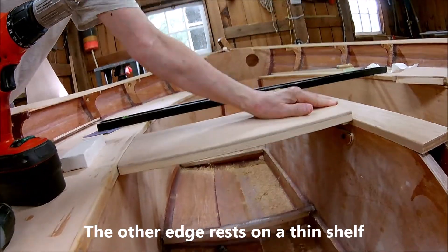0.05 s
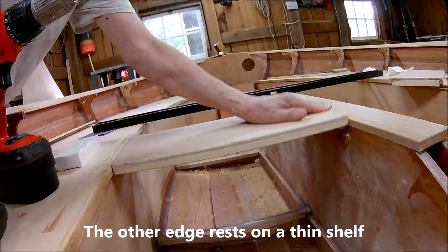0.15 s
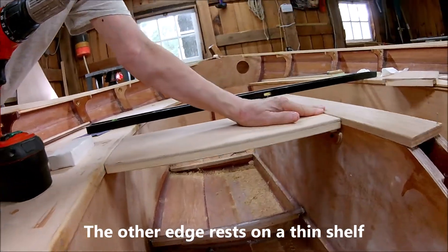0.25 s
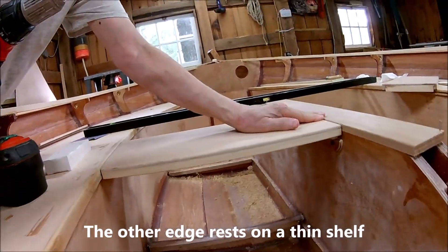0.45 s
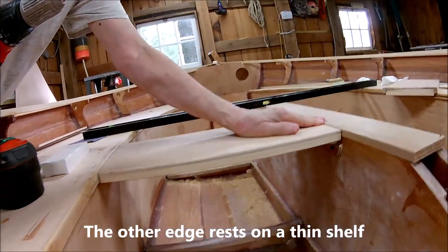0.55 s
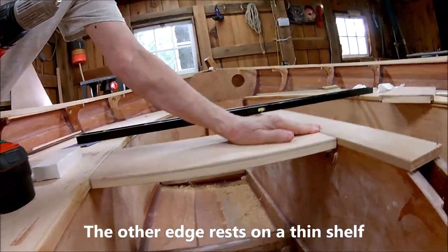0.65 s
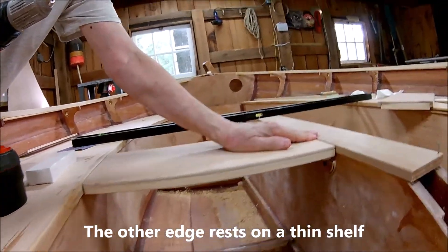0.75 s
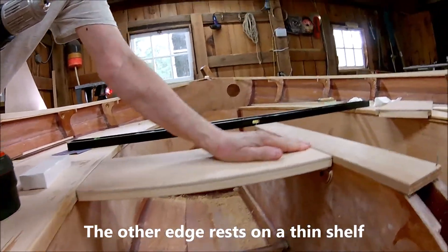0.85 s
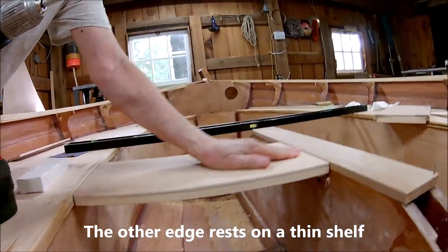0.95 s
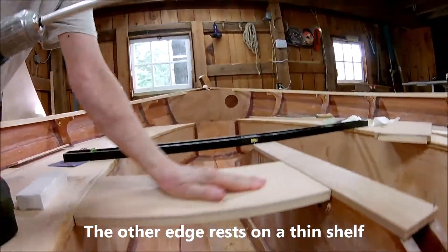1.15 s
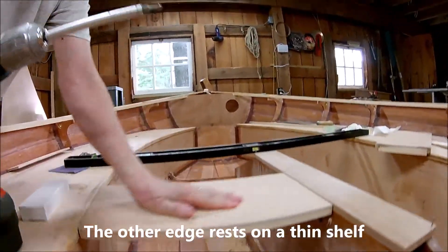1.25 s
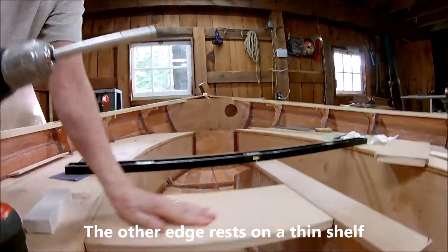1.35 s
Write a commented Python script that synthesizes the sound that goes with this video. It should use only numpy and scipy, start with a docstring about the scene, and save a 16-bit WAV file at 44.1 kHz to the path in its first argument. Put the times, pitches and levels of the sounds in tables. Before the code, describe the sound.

Loud board knock on a hollow boat hull after a brief scrape, followed by a soft dry rub

```python
"""Inside a workshop, one channel, over low rumble and faint hiss: a plywood board slides along a wooden boat's
framing (noise and tiny slips), touches down and chatters (soft ringing contacts over a dull grind).
It lands with one hard knock that overloads the recorder: board modes ring, hull and workshop answer in a
dense tail, and the hull booms on as a slow wandering low tone. After a pause a hand pushes the board on
with a dry rub, made like the first slide."""
import sys
import numpy as np
from scipy import signal
from scipy.fft import rfft, irfft, next_fast_len
from scipy.io import wavfile
from scipy.ndimage import map_coordinates

SR = 44100
rng = np.random.default_rng(int(sys.argv[2]) if len(sys.argv) > 2 else 0)


def put_to_file(sound):
    """Save the sound as 16-bit audio at rate SR, in the file named by the first command-line argument."""
    columns = np.atleast_2d(sound).T  # one column per channel
    safe = np.clip(columns, -1, 1)
    whole_steps = np.round(safe * 32767)
    wavfile.write(sys.argv[1], SR, whole_steps.astype(np.int16))


N = 61739

# Room tone, rumble spectrum: f/Hz, density/dB per Hz (relative)
RUMBLE_SPECTRUM = [(12, -38), (20, -8.5), (43, -13.5), (90, -8.5), (141, -13.5), (179, -29.5), (321, -24),
                   (354, -31.5), (600, -42.5), (780, -73), (1320, -120)]
# Faint hiss spectrum: f/Hz, density/dB per Hz (relative)
HISS_SPECTRUM = [(290, -29.5), (500, 4.5), (2130, -12), (2330, -11.5), (2850, -13), (3490, -15.5),
                 (4660, -18), (16000, -21.5)]
RUMBLE_DB, HISS_DB = -59, -71  # rms levels; the rumble wavers about its own

# Hull boom: t/s, level/dB before its waver
BOOM_LEVEL = [(.18, -62), (.21, -48), (.29, -48), (.37, -43), (.45, -48), (.55, -58), (.7, -63), (1.1, -64),
              (1.3, -75)]
BOOM_HZ, BOOM_WANDER_HZ = 37, 4  # centre; size of the random pitch wander

# Decay of the early answer of hull and workshop: f/Hz, t60/s
SHOP_DECAY = [(100, .3), (400, 0.17), (1000, 0.19), (2500, .15), (4500, .12), (7000, 0.095), (12000, .06)]
# Colour of that dense answer: f/Hz, density/dB per Hz (relative)
SHOP_COLOUR = [(35, -30.5), (60, -4.5), (173, -8.5), (253, -3.5), (371, -14), (544, -7.5), (934, -5.5),
               (1020, -7), (1470, -8), (2200, -18), (2690, -21.5), (3150, -31), (4030, -28), (13000, -75.5)]
SHOP_DB, SHOP_RISE_S = 13.5, .006  # level relative to the contact; time constant of the swell
LATE_DB, LATE_LONGER = -11.5, 2.763  # a weaker tail under it; its t60 as a multiple of the early one

# Board sliding on frame, one table a slide: t/s, body level/dB, treble level/dB, before their wavers
SLIDE_LEVELS = [
    [(0, -60.5, -73), (.1, -60, -73.5), (.14, -56, -70), (.17, -42.5, -68), (.19, -38.5, -54),
     (.212, -45, -62), (.26, -110, -115)],
    [(.74, -90, -93), (.77, -80, -105), (.8, -64.5, -79), (.84, -59, -75), (.88, -51.5, -64.5),
     (1.05, -49.5, -61.5), (1.18, -48.5, -60), (1.26, -50, -58), (1.4, -53, -64.5)],
]
# Broad resonances of the rubbed board: f/Hz, density/dB per Hz (relative)
RUB_BODY = [(120, -40), (200, -7.5), (233, -22), (311, -22.5), (424, -13.5), (728, -10.5), (888, -5.5),
            (1530, -4.5), (1820, -2.5), (2800, -32.5), (3640, -45.5), (6160, -120)]
# Treble of the rub: f/Hz, density/dB per Hz (relative)
RUB_TREBLE = [(1470, -32), (2500, 0.5), (2830, -14), (3460, -4.5), (3720, -3.5), (4050, 0), (4480, -6),
              (5370, -10.5), (7060, -9.5), (7980, -28.5), (8950, -21.5), (10400, -22), (11500, -27),
              (14000, -39)]
SLIPS_PER_S, SLIP_SPREAD_DB = 2000, 2.5  # mean rate; mean random boost of a slip
SLIP_SHARE = .3  # rms of the slips against noise of rms 1

# The edge grinds before it lands: t/s, level/dB before its waver
JUDDER_LEVEL = [(.1455, -60), (.147, -35), (.165, -36), (.18, -30), (.19, -25), (.203, -25), (.211, -29),
                (.225, -50), (.25, -120)]
# Colour of the grind: f/Hz, density/dB per Hz (relative)
JUDDER_BODY = [(53, -37), (90, -12.5), (172, 4.5), (363, -13), (459, 7.5), (723, -11), (789, 1.5),
               (849, -17.5), (1070, 0), (1170, -10.5), (1600, -8), (3000, -38.5), (3900, -73.5),
               (6600, -120)]

# Contacts of board on frame: t/s, strength/dB, contact sharpness f/Hz
CONTACTS = [(.1462, -27, 500), (.1835, -27, 900), (.1895, -26, 600), (.198, -27, 500), (.212, 6, 6000),
            (.2199, -7, 3000)]
# Modes of the board: f/Hz, level/dB before scatter and contact sharpness, t60/s
BOARD_MODES = [(94, -24, 0.17), (170.2, -23.5, .2), (259.3, -24.5, .11), (479, -33, .07),
               (537.6, -18.5, 0.023), (715, -11, .07), (790, -13, .09), (1075, -1, .05), (1340, -1, .045),
               (1660, -4, .035), (2052, -10.5, 0.024), (2730, -29.5, .02), (3594, -30, .02),
               (4172, -27.5, .02)]
SCATTER_DB, RISE_S = 1.5, .0014  # random spread of mode levels; time constant of the onset
CRACK_DB, CRACK_T60_S = -47, .05  # noise in each contact, level relative to its strength

CLIP_TOP, CLIP_HARD = 1.05, 3  # ceiling of the recorder input; sharpness of its knee
TOP_HZ = 16100  # band limit of the recorder


def amp(db):
    """dB to gain."""
    return 10 ** (np.asarray(db) / 20)


def unit(x):
    """Scaled to rms 1."""
    return x / np.sqrt(np.mean(x ** 2) + 1e-20)


def along(points, hz):
    """Values of (f/Hz, value) points, read on a log frequency axis."""
    f, v = np.transpose(points)
    return np.interp(np.log(hz + 1), np.log(f + 1), v)


def curve(rows):
    """A (t/s, level/dB) curve per sample: -120 dB before its first point, the last level held after."""
    s, db = np.transpose(rows)
    return np.interp(np.arange(N) / SR, s, db, left=-120, right=db[-1])


def wobble(rate):
    """A smooth random curve, rate knots a second."""
    knots = rng.standard_normal(int(N * rate / SR) + 4)
    return map_coordinates(knots, [np.arange(N) * rate / SR])


def filtered(x, response):
    """x times a response of frequency, padded so the ends do not wrap round."""
    m = next_fast_len(N + SR // 2)
    return irfft(rfft(x, m) * response(np.fft.rfftfreq(m, 1 / SR)), m)[..., :N]


def coloured(x, spectrum):
    """x shaped to a spectrum, rms 1."""
    return unit(filtered(x, lambda hz: amp(along(spectrum, hz))))


def room_tone():
    """The place at rest: low uneven rumble and a faint steady hiss, both shaped noise."""
    rumble = amp(RUMBLE_DB + 1.2 * wobble(7)) * coloured(rng.standard_normal(N), RUMBLE_SPECTRUM)
    hiss = amp(HISS_DB) * coloured(rng.standard_normal(N), HISS_SPECTRUM)
    return rumble + hiss


def hull_boom():
    """The hull's slow low wave around and after the landing, unsteady in pitch and level."""
    turns = np.cumsum(BOOM_HZ + BOOM_WANDER_HZ * wobble(12)) / SR
    wave = np.sqrt(2) * np.sin(2 * np.pi * turns)  # rms 1
    return amp(curve(BOOM_LEVEL) + 1.9 * wobble(21)) * wave


def shop_answer(sharp_hz):
    """Dense tail of hull and workshop: noise, each frequency dying at its own speed; soft contacts dull it."""
    hz, t, z = signal.stft(rng.standard_normal(SR), SR, nperseg=256)
    fall_db = -60 * t / along(SHOP_DECAY, hz)[:, None]
    fall = amp(fall_db) + amp(LATE_DB + fall_db / LATE_LONGER)
    gain = amp(along(SHOP_COLOUR, hz)[:, None]) * fall
    softness = 1 + (hz[:, None] / sharp_hz) ** 2
    tail = signal.istft(z * gain / softness, SR, nperseg=256)[1][:SR]
    swell = 1 - np.exp(-np.arange(SR) / SR / SHOP_RISE_S)
    return tail / np.linalg.norm(tail) * swell  # energy 1 before the swell


def fibre_slips():
    """Wood fibres catching: tiny impulses of random time, size and sign, rms 1."""
    caught = rng.random(N) < SLIPS_PER_S / SR
    size = amp(SLIP_SPREAD_DB * rng.exponential(size=N))
    return unit(caught * size * np.sign(rng.normal(size=N)))


def slide():
    """Both slides: the same slips, each time with fresh noise, drive the board's broad resonances and a treble."""
    body_db, treble_db = (
        np.max([curve(np.array(rows)[:, [0, column]]) for rows in SLIDE_LEVELS], axis=0)
        for column in (1, 2))
    slips = SLIP_SHARE * fibre_slips()
    body_level = amp(body_db + 1.3 * wobble(45))
    body = body_level * coloured(slips + rng.standard_normal(N), RUB_BODY)
    treble_level = amp(treble_db + .6 * wobble(30))
    treble = treble_level * coloured(slips + rng.standard_normal(N), RUB_TREBLE)
    return body + treble


def judder():
    """A dull uneven grind of the edge from first touch to landing: shaped noise with a fast waver."""
    level = amp(curve(JUDDER_LEVEL) + 0.83 * wobble(150))
    return level * coloured(rng.standard_normal(N), JUDDER_BODY)


def knocks():
    """Each contact rings the board's modes, then hull and workshop answer; soft contacts wake mostly low tones."""
    out, t = np.zeros(N + SR), np.arange(SR) / SR
    hz, level, t60 = np.transpose(BOARD_MODES)[..., None]
    onset = 1 - np.exp(-t / RISE_S)
    for s, db, sharp_hz in CONTACTS:
        scatter = SCATTER_DB * rng.standard_normal(hz.shape)
        size = amp(level + scatter) / (1 + (hz / sharp_hz) ** 2)
        size[1::2] *= -1  # neighbouring modes start in opposite directions
        modes = size * amp(-60 * t / t60) * np.sin(2 * np.pi * hz * t)
        ring = modes.sum(0) * onset
        crack = amp(CRACK_DB - 60 * t / CRACK_T60_S) * rng.standard_normal(len(t))
        answer = amp(SHOP_DB) * shop_answer(sharp_hz)
        out[round(s * SR):][:len(t)] += amp(db) * (ring + crack + answer)
    return out[:N]


def scene():
    """Board, hull and workshop summed to one channel."""
    return (knocks() + judder() + slide() + hull_boom() + room_tone())[None]


def record(dry):
    """The recorder input overloads smoothly on the hard knock; then nothing stays above the band limit."""
    held = dry / (1 + np.abs(dry / CLIP_TOP) ** CLIP_HARD) ** (1 / CLIP_HARD)
    return filtered(held, lambda hz: hz < TOP_HZ)


dry = scene()
out = record(dry)
put_to_file(out)
```